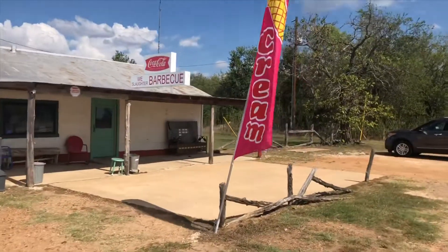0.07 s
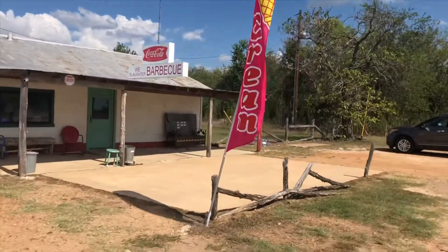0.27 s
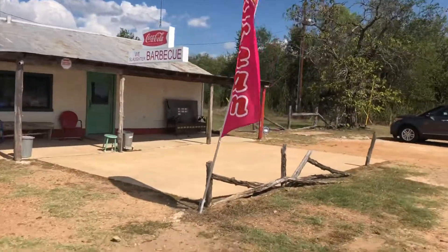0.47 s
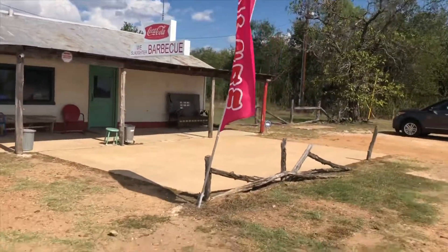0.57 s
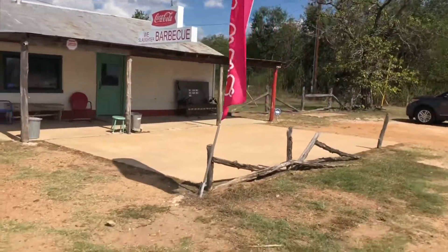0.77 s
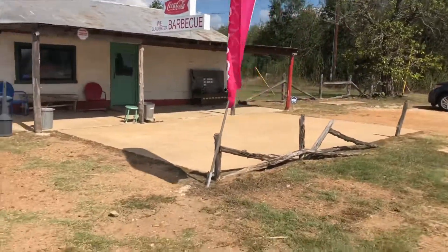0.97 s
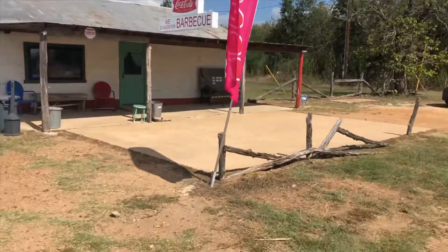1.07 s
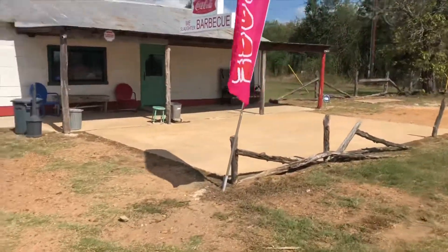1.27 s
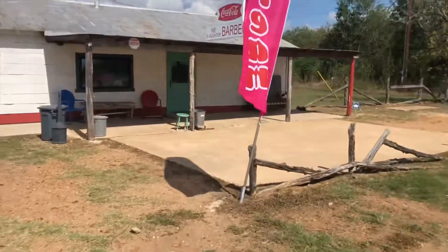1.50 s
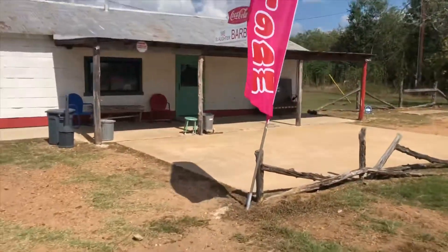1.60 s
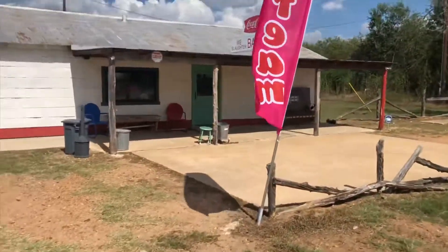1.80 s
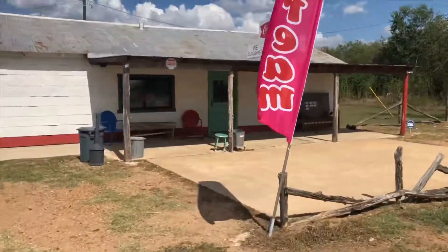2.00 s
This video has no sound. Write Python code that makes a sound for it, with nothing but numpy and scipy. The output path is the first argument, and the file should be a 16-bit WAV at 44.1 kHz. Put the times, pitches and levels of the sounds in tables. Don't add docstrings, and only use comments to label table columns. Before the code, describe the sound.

Someone walks over gritty ground outdoors: a short crunch, a louder stony one with a sharp twig crack, then a softer scrape; low wind thumps bump the camera microphone over a faint distant road hum.

```python
import sys
import numpy as np
from scipy import signal
from scipy.fft import rfft, irfft
from scipy.io import wavfile

SR = 44100
rng = np.random.default_rng(int(sys.argv[2]) if len(sys.argv) > 2 else 0)


def gain_from_decibels(decibels):
    exponent = np.asarray(decibels, float) / 20
    return 10 ** exponent


def log_audio(samples):
    frames = np.atleast_2d(samples).T
    limited = np.clip(frames, -1, 1)
    pcm = np.round(limited * 32767).astype(np.int16)
    wavfile.write(sys.argv[1], SR, pcm)


N = 90404

# pitch_hz, level_db
FAR_COLOUR = [(88, -65), (150, -3), (356, -3), (618, -10.5), (767, -0.5), (2870, -18.5), (12300, -28),
              (15600, -26.5), (16500, -57)]
# time_s, level_db
FAR_SWELL = [(0, 16), (.4, 11), (.8, 11.5), (1.4, 11.5), (2.05, 11)]
# pitch_hz, level_db
RUMBLE_COLOUR = [(15, 9), (25, -44), (59, 12), (189, 4), (243, -8.5), (387, -27), (419, -11.5), (600, -33),
                 (780, -92), (1320, -120)]
# time_s, level_db
GUSTS = [(0, -47.5), (.05, -57), (.16, -54.5), (.21, -53.5), (.3, -48), (.45, -54), (.52, -49.5),
         (.6, -49.5), (.66, -49), (.84, -39.5), (1.08, -47), (1.25, -37.5), (1.36, -53.5), (1.48, -44),
         (1.56, -55), (1.88, -62.5), (2.0, -50.5), (2.05, -56)]
# start_s, peak_db, pitch_hz, rise_s
EDDIES = [(0.001, -41.5, 133.4, 0.0045), (0.037, -46, 280, 0.0019), (0.12, -53.5, 310, 0.0045),
          (0.191, -38.5, 153, 0.014), (0.282, -43, 250, 0.01), (0.316, -37.5, 124, 0.0041),
          (0.355, -34.5, 153, 0.0067), (0.416, -39.5, 160, 0.0093), (0.431, -31, 177, 0.0085),
          (0.455, -37, 128, 0.0079), (0.579, -38, 188, 0.005), (0.693, -35.5, 167.7, 0.0091),
          (0.756, -34.5, 178, 0.0045), (0.797, -34, 177, 0.0085), (0.814, -35, 146, 0.0063),
          (0.862, -30, 176.7, 0.0072), (0.883, -31.5, 302, 0.0036), (0.896, -25, 408, 0.0094),
          (1.106, -39, 223, 0.0099), (1.134, -23.5, 259, 0.0048), (1.149, -28.5, 204, 0.009),
          (1.179, -27, 226, 0.0067), (1.198, -32, 163, 0.0056), (1.233, -30.5, 302.7, 0.0098),
          (1.292, -31.5, 186, 0.0089), (1.404, -38, 153, 0.0081), (1.435, -39, 191, 0.0098),
          (1.45, -47.5, 192, 0.0095), (1.466, -31.5, 115, 0.0047), (1.506, -40, 169, 0.0028)]
# pitch_hz, level_db
GRIT_COLOUR = [(1180, 13), (2000, 11.5), (2390, 3.5), (3030, 3.5), (6760, 5), (10400, -9), (15100, 2),
               (16100, -18), (16500, -59)]
# start_s, peak_db, pitch_hz
SNAPS = [(.095, -46, 2380), (.135, -46, 3040), (.192, -45.5, 3000), (.226, -50.5, 5470),
          (.4955, -27.5, 4900), (.5245, -34.5, 5800), (.6705, -34, 2230), (.6785, -33.5, 3950),
         (.743, -41, 11900), (.881, -45, 12000), (1.126, -53, 6000), (1.170, -34, 5700),
         (1.263, -36.5, 6300), (1.277, -43, 2960), (1.295, -42, 6600), (1.353, -39, 5040),
         (1.375, -44, 1940), (1.431, -40, 3880), (1.504, -43, 7900), (1.661, -42, 7500),
         (1.812, -47, 13000)]
# start_s, peak_db, pitch_hz
CHIPS = [(.1205, -44, 2170), (.221, -49, 2010), (.245, -50, 2500), (.2935, -49, 2500), (.381, -48, 2200),
         (.431, -48.5, 3050), (.4835, -36, 6000), (.4915, -37, 3550), (.4995, -40, 3000),
         (.5215, -30.5, 5570), (.547, -44, 11000), (.579, -48, 7000), (.5535, -33, 1480),
         (.6235, -40, 5530), (.6785, -34.5, 14500), (.7215, -41, 4360), (.9715, -34, 6500),
         (.975, -23.5, 5560), (.981, -30, 5030), (.987, -24, 6000), (1.0055, -30, 6000),
         (1.0215, -39, 12100), (1.034, -30, 4500), (1.040, -34, 6000), (1.0725, -39, 9100),
         (1.366, -44, 3020), (1.3945, -44, 3880), (1.406, -45.5, 5000), (1.4895, -49, 4000),
         (1.5085, -39.5, 3180), (1.5665, -34, 5670), (1.578, -39, 2200), (1.590, -41, 3450),
         (1.6385, -37, 2870), (1.6465, -39.5, 3440), (1.6875, -33.5, 2530), (1.751, -33, 3470),
         (1.7225, -42, 1980), (1.733, -33, 2550), (1.740, -33, 9050), (1.787, -36, 2480),
         (1.8465, -49, 2960), (1.863, -47.5, 2900)]
# start_s, peak_db, pitch_hz
TICKS = [(.1200, -39, 13000), (.1203, -41.5, 6050), (.7165, -32, 5300), (1.2195, -17.5, 5720),
         (1.2323, -29.5, 7240), (1.605, -42, 5000), (1.7705, -35.5, 6500), (1.934, -40, 1760),
         (1.144, -38, 13000), (1.1705, -31, 11000), (1.205, -43, 12000), (1.2625, -38, 13000),
         (1.287, -43, 9000), (1.310, -48, 11000), (1.337, -45, 6000), (.1335, -53, 13000)]
# pitch_hz, level_db
STONE_COLOUR = [(150, -46), (250, -4.5), (360, 4), (568, -6.5), (927, 1), (1320, 0.5), (1560, 0.5),
                (3000, -63), (3900, -50), (6600, -120)]
# start_s, hold_s, grit_db, stones_db (over grit), finest_sand_db (over grit)
CRUSHES = [(0.481, 0.019, -41.5, 0, -13), (0.511, 0.015, -49.5, 2, -3), (0.526, 0.031, -50.5, 5, -6.5),
           (0.563, 0.062, -51, 3.5, -10.5), (0.66, 0.034, -59, 6, -2), (0.716, 0.0071, -57, -29, 5),
           (.948, 0.018, -49.5, 14.5, -12), (0.972, 0.022, -48.5, 15.5, 11), (0.999, 0.044, -43, 16, 5),
           (1.068, 0.041, -61.5, 13, 1), (1.121, 0.033, -66.5, 23, 12), (1.159, 0.025, -50, 7.5, -8),
           (1.199, 0.046, -57.5, 11.5, 1.5), (1.258, 0.065, -76.5, 3, 17), (1.556, 0.010, -47, -11, -9),
           (1.574, 0.023, -54.5, -1, -7), (1.617, 0.055, -61, 5, -4), (1.659, 0.017, -57, 4, -7),
           (1.6827, 0.0052, -43.5, 7.5, -6.5), (1.698, 0.021, -49, -10, -9), (1.72, 0.0066, -44.5, 3, -11),
           (1.732, 0.028, -43, 0.5, -9.5), (1.767, 0.02, -44.5, 5, -17.5), (1.793, 0.059, -57, -4, -12.5)]
# start_s, peak_db, pitch_hz
KNOCKS = [(0.498, -26.5, 1030), (0.520, -35.5, 800), (0.547, -37, 1420), (0.623, -32, 1290),
          (0.955, -36, 1300), (1.0028, -22.5, 1040), (1.0385, -21.5, 1250), (1.05, -23, 1330),
          (1.0625, -27.5, 1190), (1.076, -36.5, 1350), (1.1415, -27, 1370), (1.198, -29.5, 1520),
          (1.508, -39, 1340), (1.563, -39.5, 820), (1.604, -30, 1650), (1.64, -43, 1030),
          (1.685, -39, 1630), (1.774, -30, 1060)]
# start_s, peak_db, pitch_hz
THUDS = [
    (0.499, -27.5, 540),
    (1.566, -40, 620),
    (1.606, -32.5, 560),
    (1.688, -38.5, 745),
    (1.785, -40, 480),
]
# start_s, hold_s, level_db, top_hz
BUFFETS = [(0.856, 0.0047, -39, 587), (.885, .03, -40, 650), (1.101, 0.035, -41.5, 630),
           (1.138, 0.027, -34.5, 556), (1.177, 0.031, -35, 556), (1.234, 0.013, -36.5, 600),
           (1.298, 0.0081, -39.5, 600), (1.391, 0.039, -53.5, 556), (1.439, 0.043, -57, 510)]


def rms_one(x):
    return x / np.sqrt(np.mean(x ** 2) + 1e-20)


def in_time(rows):
    times_s, *columns = np.transpose(rows)
    return [np.interp(np.arange(N) / SR, times_s, column) for column in columns]


def at_hz(points, hz):
    table_hz, table_db = np.transpose(points)
    return np.interp(np.log(hz), np.log(table_hz), table_db, -90, -90)


def drift(rate_hz):
    r = np.exp(-2 * np.pi * rate_hz / SR)
    noise = rng.standard_normal(N + SR)
    return rms_one(signal.lfilter([1], [1, -2 * r, r * r], noise)[SR:])


def ring(x, hz, t60_s):
    r = gain_from_decibels(-60 / (t60_s * SR))
    w = 2 * np.pi * hz / SR
    return signal.lfilter([0, np.sin(w)], [1, -2 * r * np.cos(w), r * r], x + 1e-18)


def coloured_noise(colour):
    hz = np.maximum(np.arange(N // 2 + 1) * SR / N, 1)
    return rms_one(irfft(rfft(rng.standard_normal(N)) * gain_from_decibels(at_hz(colour, hz)), N))


def grains(per_s, spread_db, colour, cycles, count):
    sizes = gain_from_decibels(spread_db * np.minimum(rng.exponential(1, N), count / 4))
    sizes = sizes * rng.choice([-1, 1], N) * (rng.random(N) < per_s / SR)
    dealt = rng.integers(0, count, N)
    out = np.zeros(N)
    for k, hz in enumerate(np.geomspace(colour[1][0], colour[-2][0], count)):
        out += gain_from_decibels(at_hz(colour, hz)) * hz * ring(sizes * (dealt == k), hz, cycles / hz)
    return rms_one(out)


def far_traffic():
    out = coloured_noise(FAR_COLOUR)
    for hz, width_hz, db in [(772, 25, -7), (960, 180, -6)]:
        roar = ring(rng.standard_normal(N), hz, 2 / width_hz)
        out = out + gain_from_decibels(db) * rms_one(ring(roar, hz, 1 / width_hz))
    swell_db = in_time(FAR_SWELL)[0] + 0.6 * drift(6.4)
    return gain_from_decibels(-69.5 + swell_db) * rms_one(out)


def wind_rumble():
    return gain_from_decibels(in_time(GUSTS)[0] + 0.29 * drift(16)) * coloured_noise(RUMBLE_COLOUR)


def loose_rustle():
    return gain_from_decibels(-73.5) * grains(330 * gain_from_decibels(6 * drift(12)), 3, GRIT_COLOUR[:-3], 5, count=12)


def wind_eddies():
    out, t = np.zeros(N + SR), np.arange(SR // 8) / SR
    for start_s, db, hz, rise_s in EDDIES:
        noise = rng.standard_normal(len(t))
        pitch_hz = hz * (0.582 + 1.837 * np.exp(-t / 0.0068))
        phase = 2 * np.pi * np.cumsum(pitch_hz) / SR + 3 * noise[0]
        sos = signal.butter(2, [hz * 0.36, hz * 1.146], "band", fs=SR, output="sos")
        wobble = np.sin(phase) + 0.7 * rms_one(signal.sosfilt(sos, noise))
        u = t / rise_s
        puff = wobble * (u * np.exp(1 - u)) ** 2.28
        out[int(start_s * SR):][:len(t)] += gain_from_decibels(db + 4) * puff / np.abs(puff).max()
    return signal.sosfilt(signal.butter(4, 800, fs=SR, output="sos"), out[:N])


def cracks(events, cycles, burst_s, partner, partner_db):
    out, t = np.zeros(N + SR), np.arange(SR // 20) / SR
    for start_s, db, hz in events:
        burst = (rng.standard_normal(len(t)) + 3 * (t == 0)) * np.exp(-t / burst_s)
        top_hz = min(hz * max(partner, 1) * 1.3, 0.45 * SR)
        b, a = signal.butter(1, [hz / 4, top_hz], "band", fs=SR)
        hit = signal.lfilter(b, a, burst)
        other_hz = min(hz * partner, 0.36 * SR)
        x = ring(hit, hz, cycles / hz) + gain_from_decibels(partner_db) * ring(hit, other_hz, 2.5 / other_hz)
        out[int(start_s * SR):][:len(t)] += gain_from_decibels(db) * x / np.abs(x).max()
    return out[:N]


def twig_snaps():
    return cracks(SNAPS, cycles=7, burst_s=0.0006, partner=1.7, partner_db=-8)


def chips_and_ticks():
    crackle = cracks(CHIPS, cycles=6, burst_s=0.0008, partner=1.4, partner_db=-6)
    return crackle + cracks(TICKS, cycles=9, burst_s=0.00012, partner=2.2, partner_db=-13)


def grit(band):
    x = grains(12000 * gain_from_decibels(2.5 * drift(120)), 4.5, GRIT_COLOUR, 12, count=16)
    x = rms_one(x + 0.5 * coloured_noise(GRIT_COLOUR))
    return signal.sosfilt(signal.butter(2, 4800, band, fs=SR, output="sos"), x)


def small_stones():
    jostle = grains(2400 * gain_from_decibels(3.7 * drift(45)), 2.55, STONE_COLOUR, 10.2, count=14)
    return rms_one(jostle + 0.5 * coloured_noise(STONE_COLOUR))


def footstep_crunch():
    clumps_db = 2.2 * drift(160)
    stones, body, sand = small_stones(), grit("low"), grit("high")
    out, t = np.zeros(N), np.arange(N) / SR
    for start_s, hold_s, db, stones_db, sand_db in CRUSHES:
        attack = np.clip((t - start_s) / 0.0012, 0, 1)
        release_s = 0.0035 + 0.25 * hold_s
        press = attack * np.exp(-np.maximum(t - start_s - hold_s, 0) / release_s)
        ground = body + gain_from_decibels(sand_db) * sand + gain_from_decibels(stones_db - 6.5) * stones
        out += gain_from_decibels(db + clumps_db) * press * ground
    return out


def stone_knocks():
    return cracks([*KNOCKS, *THUDS], cycles=7.3, burst_s=0.0012, partner=0.83, partner_db=-42)


def wind_buffets():
    out, t = np.zeros(N + SR), np.arange(SR // 8) / SR
    for start_s, hold_s, db, top_hz in BUFFETS:
        sos = signal.butter(3, [top_hz * 0.44, top_hz], "band", fs=SR, output="sos")
        rough = rms_one(signal.sosfilt(sos, rng.standard_normal(len(t))))
        shape = np.clip(t / 0.0064, 0, 1) * np.exp(-np.maximum(t - hold_s, 0) / 0.0039)
        out[int(start_s * SR):][:len(t)] += gain_from_decibels(db) * rough * shape
    return out[:N]


def scene():
    distance_and_wind = far_traffic() + wind_rumble() + wind_eddies() + wind_buffets()
    twigs_and_chips = twig_snaps() + chips_and_ticks()
    feet = loose_rustle() + footstep_crunch() + stone_knocks()
    return (distance_and_wind + twigs_and_chips + feet)[None]


def band_limit(x):
    return signal.sosfilt(signal.butter(12, 16660, fs=SR, output="sos"), x)


def record(dry):
    top_cut = signal.cheby2(12, 20, 16050, fs=SR, output="sos")
    mix = signal.sosfilt(top_cut, dry)
    return band_limit(mix)


dry = scene()
out = record(dry)
log_audio(out)
```